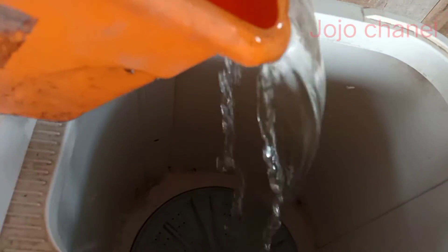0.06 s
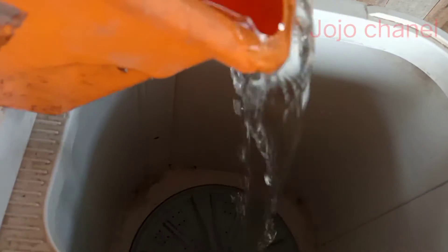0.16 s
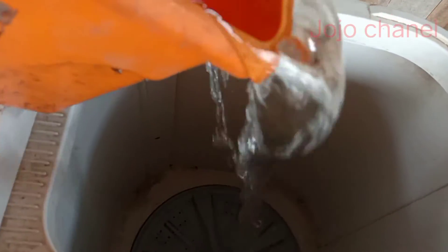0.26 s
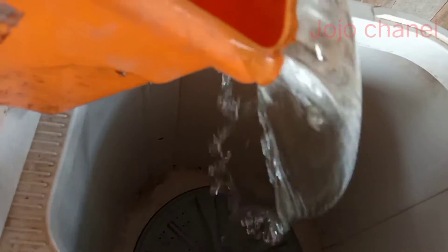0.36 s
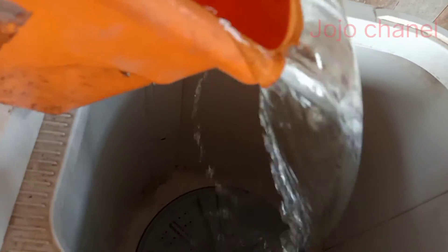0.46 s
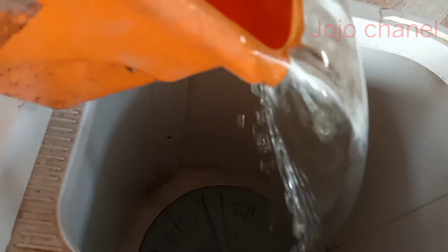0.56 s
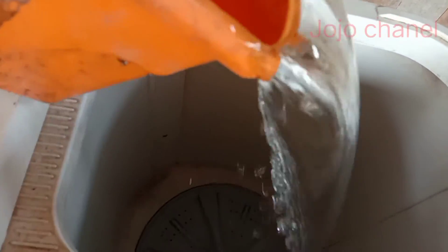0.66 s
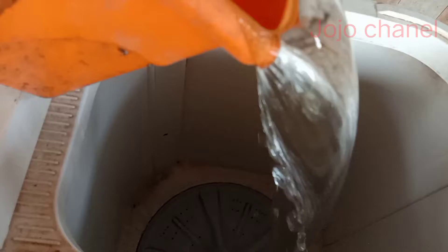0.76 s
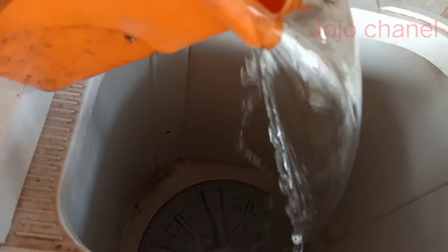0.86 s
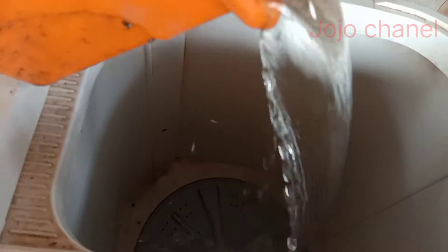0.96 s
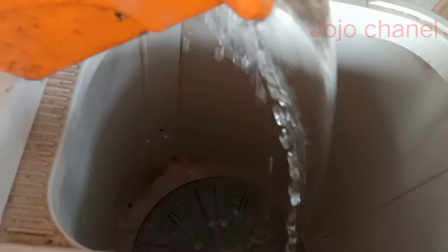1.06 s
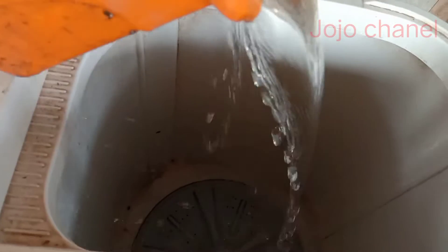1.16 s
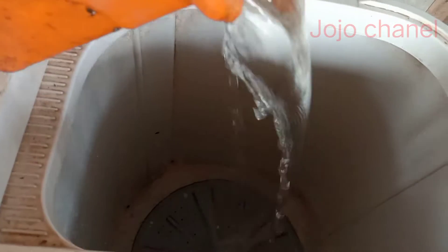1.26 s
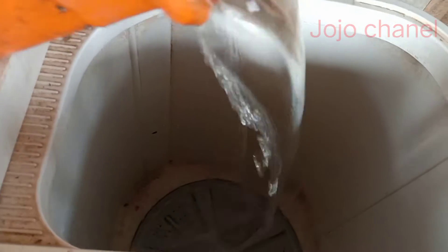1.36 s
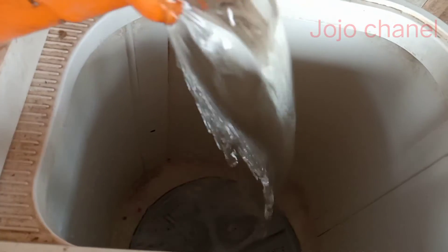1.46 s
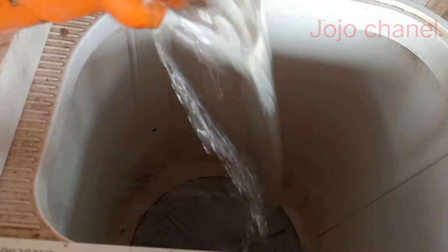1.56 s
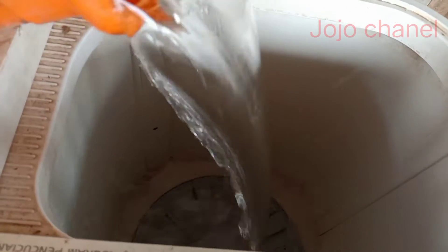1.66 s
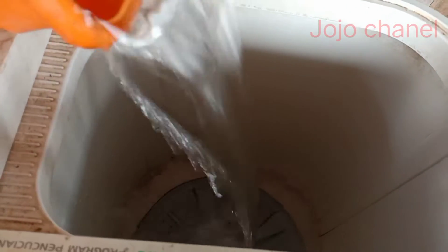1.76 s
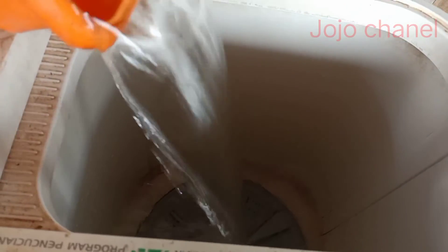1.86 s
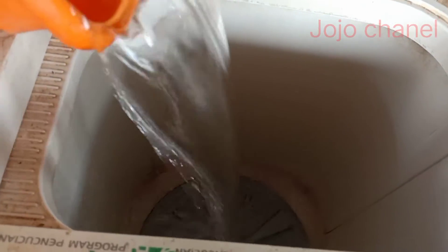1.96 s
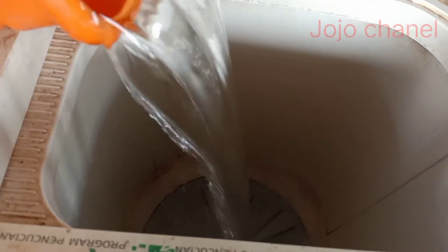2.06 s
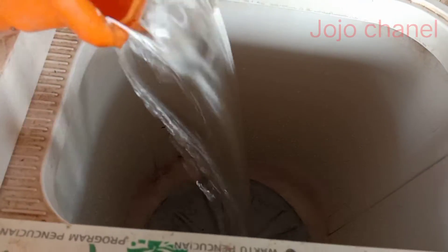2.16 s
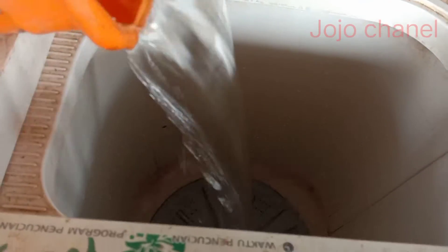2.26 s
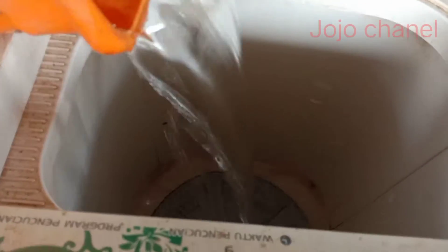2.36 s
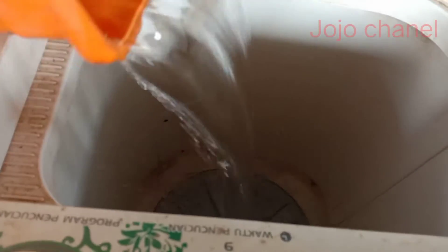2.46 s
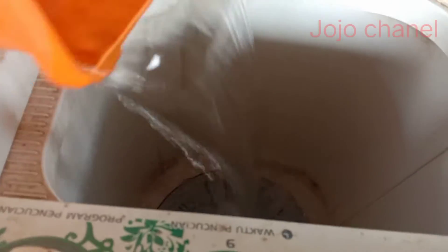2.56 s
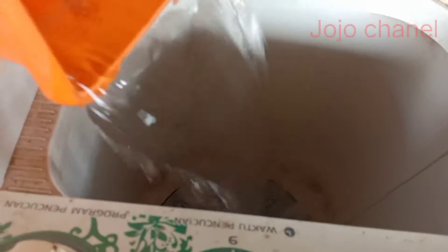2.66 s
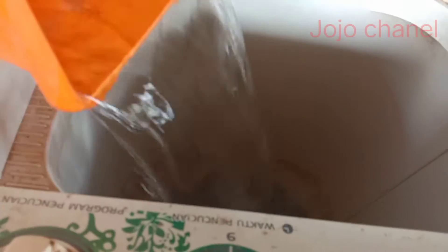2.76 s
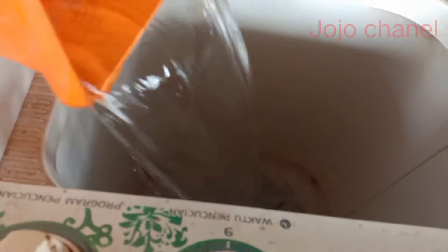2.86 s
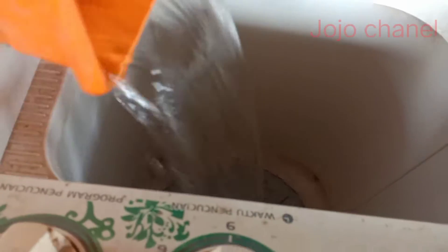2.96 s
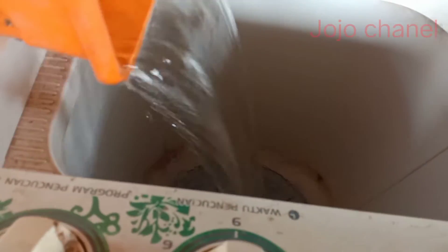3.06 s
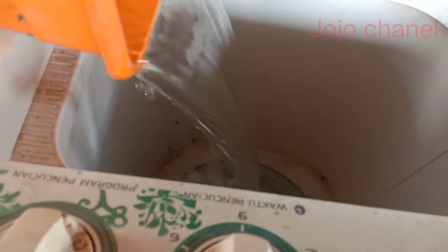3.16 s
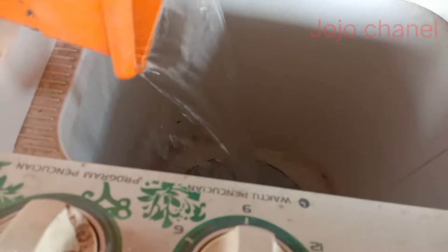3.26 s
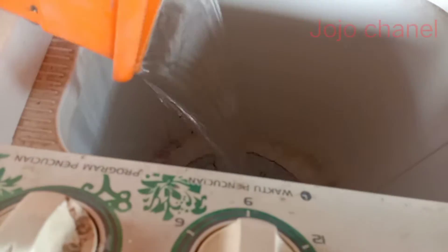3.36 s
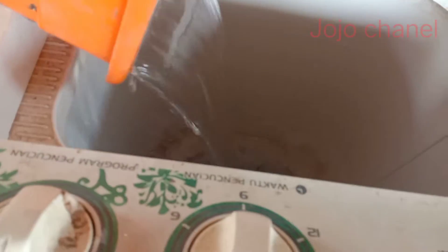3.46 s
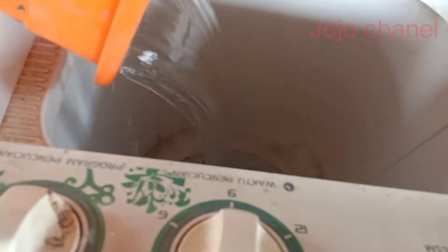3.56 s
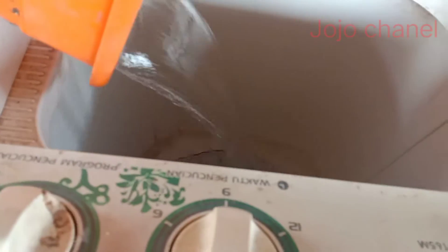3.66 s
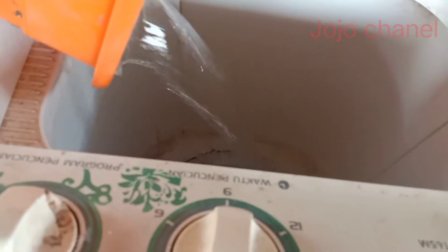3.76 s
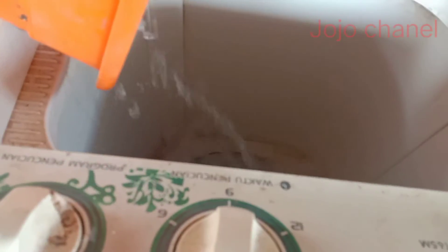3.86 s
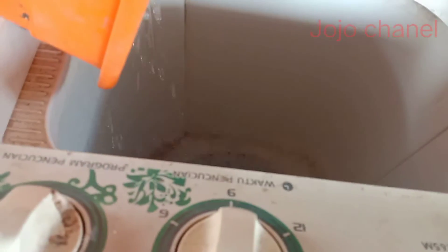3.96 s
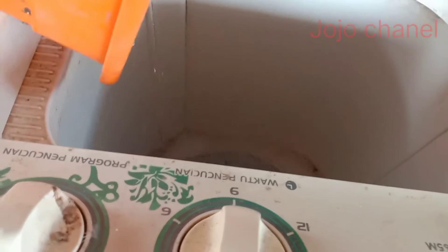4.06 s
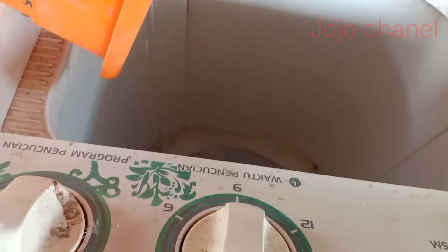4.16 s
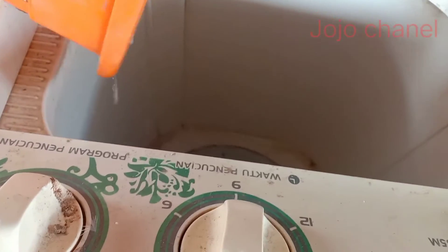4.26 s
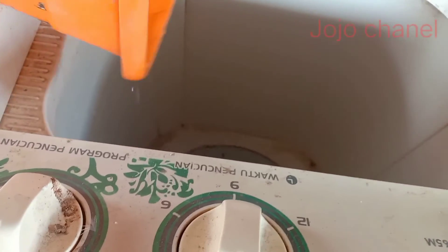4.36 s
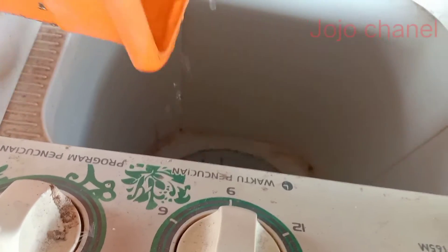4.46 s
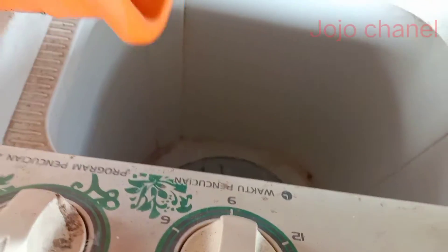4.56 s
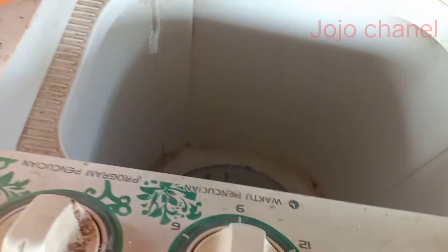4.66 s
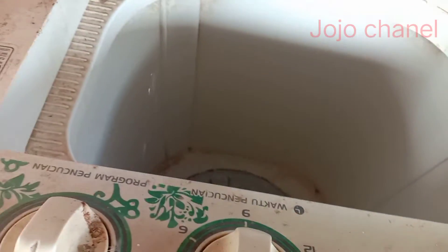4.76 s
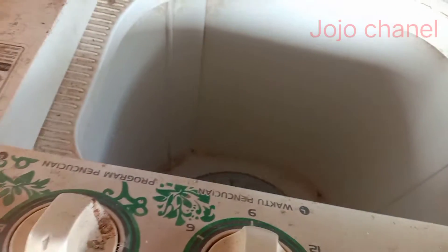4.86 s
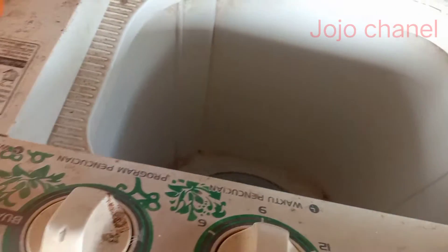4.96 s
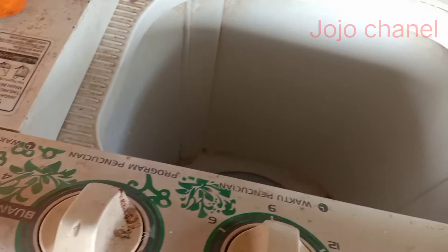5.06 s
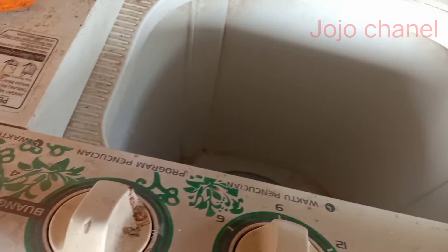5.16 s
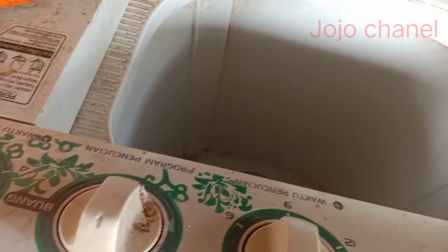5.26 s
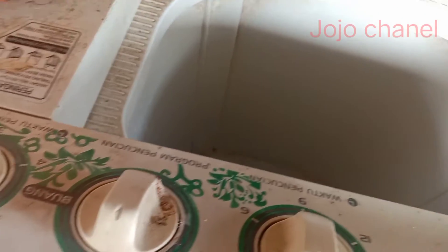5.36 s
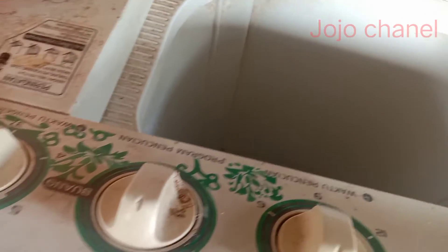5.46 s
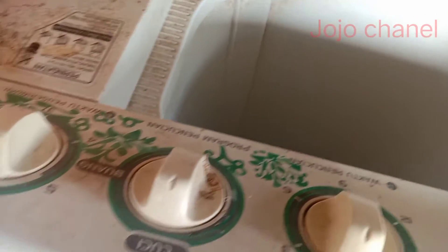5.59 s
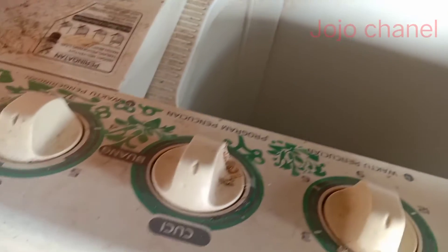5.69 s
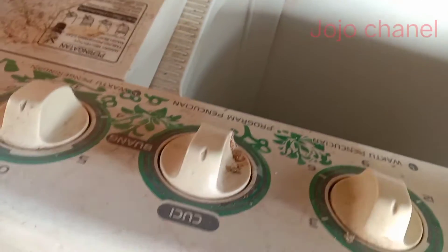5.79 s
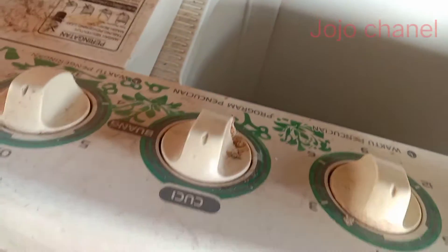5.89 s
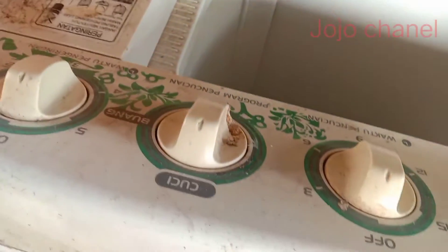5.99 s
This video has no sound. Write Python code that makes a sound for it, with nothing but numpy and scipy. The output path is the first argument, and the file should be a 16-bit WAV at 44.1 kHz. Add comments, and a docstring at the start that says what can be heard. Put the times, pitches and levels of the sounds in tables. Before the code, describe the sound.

A steady, lumpy stream splatters on the floor of a deep plastic tub, breaks off, and leaves small drips, bubbles and light bucket bumps.

```python
"""In a quiet room, water poured from a bucket splashes on the floor of a deep plastic tub that booms and rings.
The stream is droplet grains and noise over gurgling bubbles; the pushing water drives resonances of the tub.
Slaps are ticks with bursts of fizz, bubbles are short rising tones. Then the stream breaks off and the pool
settles with a few drips, while the bucket knocks (struck modes) and rubs (stick-slip clicks) on the plastic."""
import sys
import numpy as np
from scipy import signal
from scipy.fft import rfft, irfft
from scipy.io import wavfile
from scipy.ndimage import uniform_filter1d

SR = 44100
rng = np.random.default_rng(int(sys.argv[2]) if len(sys.argv) > 2 else 0)


def level_to_linear(level):
    """Convert decibel levels to linear amplitude factors, elementwise."""
    exponent = np.asarray(level, float) / 20
    return 10 ** exponent


def transcribe(u):
    """Save the signal u as a 16-bit wav file named by the first command-line argument.

    u: samples, shape (n,) or (channels, n), limited to [-1, 1]; the rate is SR.
    q: integer samples, one column per channel.
    """
    v = np.clip(np.atleast_2d(u).T, -1, 1)
    q = np.round(v * 32767).astype(np.int16)
    wavfile.write(sys.argv[1], SR, q)


N = 265923  # length in samples


def evened(x):
    """Scales to rms 1."""
    return x / np.sqrt(np.mean(x ** 2) + 1e-20)


def add(mix, start_s, sound):
    """Mixes a sound in at its start time."""
    part = mix[round(start_s * SR):][:len(sound)]
    part += sound[:len(part)]


def coloured(x, points):
    """Flattens the spectrum of x, gives it the colour drawn by the points, and evens it to rms 1."""
    spectrum, hz = rfft(x), np.fft.rfftfreq(len(x), 1 / SR)
    own = np.sqrt(uniform_filter1d(abs(spectrum) ** 2, size=2001) + 1e-9)
    point_hz, point_db = np.transpose(points)
    colour_db = np.interp(np.log(hz + 1), np.log(point_hz), point_db, -90, -90)
    return evened(irfft(spectrum / own * level_to_linear(colour_db), len(x)))


def resonate(x, hz, width_hz):
    """Resonance of gain 1: shifts the pitch hz, fixed or gliding, to zero, smooths, and shifts back."""
    turn = np.exp(2j * np.pi * np.cumsum(hz * np.ones(len(x))) / SR)
    r = np.exp(-np.pi * width_hz / SR)
    return 2 * (turn * signal.lfilter([1 - r], [1, -r], x / turn)).real


def blip(hz, cycles, glide):
    """A pocket of air: quick start, dying over some cycles, in which the pitch rises by twice the glide."""
    u = np.arange(int(3 * SR * cycles / hz) + 8) * hz / SR  # time in cycles
    tone = np.sin(2 * np.pi * u * (1 + glide * u / cycles))
    return tone * (1 - np.exp(-3 * u)) * np.exp(-2.5 * u / cycles)


def ringing(x, peaks):
    """Steep resonances (pitch_hz, width_hz, level_db), each applied twice, the second twice as wide."""
    total = np.zeros(len(x))
    for hz, width_hz, level_db in peaks:
        total += level_to_linear(level_db) * evened(resonate(resonate(x, hz, width_hz), hz, 2 * width_hz))
    return evened(total)


def fluttering(tone, rough, width_hz):
    """Random swings of strength widen a tone into a band of the same power."""
    r = np.exp(-2 * np.pi * width_hz / SR)
    swing = evened(signal.lfilter([1], [1, -2 * r, r * r], rng.standard_normal(4000)))
    sound = tone * (1 - rough + rough * np.resize(swing, len(tone)))
    return sound / np.sqrt(1 - 2 * rough * (1 - rough))


def clumps(per_s, depth_db):
    """The stream breaks into lumps: gain that jumps up and sinks back."""
    lumps = (rng.random(N) < per_s / SR) * rng.exponential(1, N)
    fall = signal.lfilter([1], [1, -np.exp(-1 / (0.015 * SR))], lumps)
    return level_to_linear(depth_db * np.tanh(fall / 2))


def grains(lo_hz, hi_hz, per_s, cycles, spread_db, count):
    """Many small bursts on a ladder of pitches, each pitch with its own random train."""
    out = np.zeros(N)
    for hz in np.geomspace(lo_hz, hi_hz, count):
        strength = level_to_linear(spread_db * np.minimum(rng.exponential(1, N), 4))
        train = strength * (rng.random(N) < per_s / count / SR)
        out += signal.oaconvolve(train, blip(hz, cycles, 0.05))[:N]
    return out


def patchy(x, depth_db):
    """Separate splashes light up separate patches of pitch for a few hundredths of a second."""
    z = signal.stft(x, nperseg=256, noverlap=192)[2]
    field = uniform_filter1d(rng.standard_normal(z.shape[::-1]).T, size=4, axis=0)
    field = uniform_filter1d(field, size=12, axis=1)
    return evened(signal.istft(z * level_to_linear(depth_db * evened(field)), nperseg=256, noverlap=192)[1][:N])


def swelling(level_db, swells):
    """Adds the power of each swell (start_s, length_s, level_db), a rounded hump, to a level curve."""
    power = level_to_linear(2 * level_db)
    spill_s = 0.016  # each hump reaches this far past both ends
    for start_s, length_s, swell_db in swells:
        hump = 2 * np.hanning(int((length_s + 2 * spill_s) * SR))  # mean 1
        add(power, max(start_s - spill_s, 0), level_to_linear(2 * swell_db) * hump)
    return np.sqrt(power)


# colour of the room noise: pitch_hz [Hz], level_db [relative dB per Hz]
ROOM_COLOUR = [(18, -47), (30, -7), (173, 2), (284, -8.5), (728, -12), (1020, -23.5), (1290, -13),
               (1640, -16.5), (3230, -20), (4420, -32.5), (7080, -38.5), (8060, -40.5), (15500, -43.5)]


def room_noise():
    """The quiet room: steady noise in a fixed colour, at -67.5 dB rms."""
    return level_to_linear(-67.5) * coloured(rng.standard_normal(N), ROOM_COLOUR)


# faint strokes of plastic on plastic: start_s [s], length_s [s], level_db [dB], first_hz [Hz], last_hz [Hz]
RUB_STROKES = [(4.918, 0.11, -63, 7140, 7200), (4.99, .07, -61, 3180, 3530), (5.0, .14, -51.5, 3140, 3040),
               (5.042, 0.19, -57, 1400, 1300), (5.135, 0.2, -57, 3180, 3050),
               (5.314, 0.19, -63, 3160, 3050), (5.372, 0.14, -61.5, 1340, 1350),
               (5.46, .15, -71, 4020, 3880), (5.46, .09, -55, 3090, 2950), (5.474, 0.15, -50.5, 1305, 1255),
               (5.53, 0.073, -60, 2750, 2500), (5.77, .13, -75, 3990, 3870)]


def rubs():
    """Uneven stick-slip clicks excite one gliding resonance with a breathy skirt."""
    out = np.zeros(N)
    for start_s, length_s, level_db, first_hz, last_hz in RUB_STROKES:
        hz = np.linspace(first_hz, last_hz, int(length_s * SR))
        wander = evened(uniform_filter1d(rng.standard_normal(len(hz)), size=1200))
        hz = hz * (1 + 0.005 * wander)
        width_hz = 32 + 0.0095 * first_hz  # higher strokes are wider and breathier
        breath = min(first_hz / 5000, 1)
        slips = (rng.random(len(hz)) < 0.3 * hz / SR) * rng.standard_normal(len(hz))
        core = evened(resonate(resonate(slips, hz, width_hz), hz, 3 * width_hz))
        skirt = evened(resonate(resonate(slips[::-1], hz, 5 * width_hz), hz, 8 * width_hz))
        stroke = evened(core + breath * skirt) * signal.windows.tukey(len(hz), 0.38)
        add(out, start_s, level_to_linear(level_db) * stroke)
    return out


# modes the plastic rings with when knocked: pitch_hz [Hz], level_db [relative dB], t60_s [s]
PLASTIC_MODES = [(97.7, 7, 0.21), (135.4, -2, 0.27), (160.3, 7.5, 0.14), (239, 2, 0.13), (299, 0.5, 0.068),
                 (366, 0, 0.084), (428, 0, 0.076), (528, -10.5, 0.12), (586, -9, 0.066), (708, -11, 0.033),
                 (960, -8, 0.03), (1060, -5, 0.11), (1370, 5, 0.083), (1465, 6, 0.056), (1760, -8, 0.067),
                 (2000, -1.5, .05), (2330, 1, 0.049)]
# blows of the bucket: start_s [s], peak_db [dB, before microphone and room], centre_hz [Hz], spread [octaves]
KNOCK_BLOWS = [(4.437, -32, 1090, 0.29), (4.466, -27, 600, 0.47), (4.484, -32, 684, 0.43),
               (4.497, -28, 511, 0.85), (4.577, -41, 134, 0.85), (4.634, -37.5, 1760, 0.58),
               (4.833, -45.5, 146, 0.97), (4.878, -44, 145, 0.57), (4.958, -20.5, 418, 0.63),
               (4.994, -34.5, 533, 0.72), (5.011, -40, 436, 0.97), (5.173, -39, 426, 0.97),
               (5.194, -41.5, 428, .7), (5.732, -31.5, 450, 0.96), (5.744, -29, 372, 1.07),
               (5.755, -30, 151, 0.91), (5.767, -39, 458, 0.85), (5.785, -40, 115.6, 0.6),
               (5.811, -40.5, 121, .72), (5.84, -48, 129, .72)]


def knocks():
    """Each blow wakes the modes near its own centre; a soft contact rounds the start."""
    hz, mode_db, t60_s = np.array(PLASTIC_MODES).T[:, :, None]
    t, out = np.arange(SR // 3) / SR, np.zeros(N)
    for start_s, peak_db, centre_hz, spread in KNOCK_BLOWS:
        near_db = -9 * (np.log2(hz / centre_hz) / spread) ** 2
        # each grip differs; a bent panel starts sharp
        detune = 1 + 0.0375 * rng.standard_normal(hz.shape) + 0.097 * np.exp(-t / 0.015)
        turns = np.cumsum(detune * hz, axis=1) / SR + 0.84 * rng.random(hz.shape)
        modes = level_to_linear(mode_db + near_db - 60 * t / t60_s) * np.sin(2 * np.pi * turns)
        modes *= 1 - np.exp(-hz * t / 0.43)  # deep modes take longer to bloom
        crack = 0.44 * uniform_filter1d(rng.standard_normal(len(t)), size=7) * np.exp(-t / 0.0023)
        sound = (modes.sum(0) + crack) * (1 - np.exp(-t / 0.00058))
        add(out, start_s, level_to_linear(peak_db) * sound / abs(sound).max())
    return out


# last drips on the pool: start_s [s], level_db [dB], pitch_hz [Hz], mist [share of fine mist at the very top]
POOL_DRIPS = [(4.2694, -44, 4640, 0.1), (4.2847, -46, 9450, 0.1), (4.338, -39, 5500, 0.4),
              (4.3594, -41, 5800, 0.1), (4.3955, -49, 5500, .9), (4.4894, -52, 4600, 0.1),
              (4.5775, -56, 7000, 0.1), (4.6445, -52, 9500, 0.98), (4.7391, -73, 9500, .9),
              (4.803, -65, 9960, 0.1), (4.8653, -68, 9100, 0.1), (4.9994, -66, 7200, 0.1),
              (5.1098, -65, 5800, 0.1), (5.2854, -70, 8960, 0.1), (5.9369, -61, 7340, 0.1)]


def drips():
    """Each drip leaves a short band of fizz and a puff of mist."""
    out = np.zeros(N)
    life_s, mist_hz = 0.017, 14900
    for start_s, level_db, pitch_hz, mist in POOL_DRIPS:
        for hz, share in ((pitch_hz, 1), (mist_hz, mist)):
            burst = fluttering(blip(hz, life_s * hz, 0.0059), 0.52, 0.097 * hz)
            add(out, start_s, share * level_to_linear(level_db) * burst)
    return out


# bubbles caught under the stream and popping in the pool:
# start_s [s], level_db [dB, before microphone and room], pitch_hz [Hz], life [cycles]
POOL_BUBBLES = [(0.152, -29, 836, 61), (0.236, -26.5, 840, 59), (0.603, -13.5, 1180, 8.4),
                (0.703, -17.5, 751, 9.6), (0.759, -19, 687, 13), (1.0735, -10, 2194, 26),
                (1.1293, -7.5, 1440, 13), (1.1972, -14, 2100, 19), (1.2457, -17.5, 1260, 23),
                (1.379, -12.5, 597, 6.5), (1.5454, -13, 1880, 30), (1.7659, -11, 1245, 26),
                (1.8573, -11.5, 1220, 58), (2.82, -11.5, 2000, 40), (2.8854, -18.5, 1500, 45),
                (2.899, -17, 1200, 27), (2.983, -17.5, 1450, 17), (3.672, -26, 906, 28),
                (4.0915, -20, 1250, 24), (4.1789, -26, 1220, 20), (4.2244, -33.5, 1430, 70),
                (4.2294, -33, 3640, 87), (4.2646, -27, 1330, 12), (4.322, -34.5, 850, 62),
                (4.331, -38, 2500, 120), (4.356, -36, 3300, 70), (4.438, -26.5, 704, 29),
                (4.44, -32, 1090, 60), (4.458, -35, 1520, 40), (4.472, -31, 700, 16),
                (4.4794, -29, 1100, 25), (4.634, -38, 1760, 35), (4.6359, -48, 2400, 40),
                (4.7451, -44, 1600, 25), (4.8357, -40.5, 1270, 18), (4.8374, -48, 760, 20),
                (4.892, -45.5, 1970, 32), (4.899, -46, 760, 24), (4.9472, -46, 2330, 39),
                (4.9591, -40, 1260, 70), (4.998, -37, 1280, 25), (4.998, -32.5, 1810, 44),
                (5.0549, -47, 1410, 35), (5.087, -39, 990, 19), (5.0986, -27, 1200, 7.1),
                (5.1552, -46, 1350, 44), (5.4806, -49, 3040, 60), (5.733, -42, 1287, 34),
                (5.7676, -50, 1260, 28), (5.8394, -50, 1070, 32)]


def bubbles():
    """A trapped bubble sounds as a nearly pure tone, rising a little as it dies."""
    out = np.zeros(N)
    for start_s, level_db, hz, cycles in POOL_BUBBLES:
        add(out, start_s, level_to_linear(level_db) * fluttering(blip(hz, cycles, 0.036), 0.35, 0.13 * hz))
    return out


# lumps of water that slap down: start_s [s], fizz_db [dB, before microphone and room],
# pitch_hz [Hz], tick_db [dB over the fizz]
WATER_SLAPS = [(0.0167, -5.5, 6470, -22), (0.0538, -11.5, 4300, -7), (0.191, -8, 5620, 1.5),
               (0.2232, -11, 3200, -4.5), (0.268, -13, 5430, -2), (0.4968, -6.5, 4980, 0),
               (0.535, -7.5, 5630, -5), (0.583, -9, 5430, -5), (0.631, -17.5, 2800, 8),
               (0.6504, -6, 3950, -4.5), (0.6687, -9, 2850, -2.5), (0.6871, -3.5, 5750, -1.5),
               (0.7195, -3, 6660, -2.5), (0.7722, -11, 2800, 18), (1.072, -12, 2265, -3),
               (1.127, -8, 2300, -12), (1.1972, -12, 2095, -6), (1.3394, -26, 4100, -5),
               (1.388, -3, 6500, -5), (1.397, -6.5, 6500, -6), (1.425, -9.5, 2800, -10),
               (1.493, -9, 2600, 11), (1.7659, -7, 4500, 1), (1.7746, -10, 2300, 0.5),
               (1.7755, -10, 5500, -3), (1.802, -14, 5200, 0), (1.832, -3.5, 5740, -9.5),
               (1.8558, -0.5, 5400, -1), (1.962, -11, 3000, -2), (2.067, -11.5, 3810, -1),
               (2.3914, -8.5, 5300, -4), (2.5391, -6.5, 3520, -6), (2.573, -10, 5000, 3),
               (2.644, -8, 4500, -4), (2.82, -24, 2000, -6), (2.8809, -18, 1543, -6),
               (2.9824, -7.5, 5750, -5), (3.16, -11.5, 3300, -2), (3.455, -14, 2530, -2),
               (3.575, -11.5, 2510, -4), (3.973, -8, 3600, -3), (4.0397, -26, 6900, -4),
               (4.0567, -8, 6800, 10), (4.09, -13.5, 2330, -4.5), (4.147, -9, 4900, 4)]


def slaps():
    """A slap is a tick with a burst of fizz around the same pitch."""
    out = np.zeros(N)
    for start_s, fizz_db, hz, tick_db in WATER_SLAPS:
        add(out, start_s, level_to_linear(fizz_db + tick_db) * fluttering(blip(hz, 1.4, 0.057), 0.15, 0.36 * hz))
        add(out, start_s, level_to_linear(fizz_db) * fluttering(blip(hz, 38, 0.0061), 0.7, 0.25 * hz))
    return out


# how hard the water works, from falling stream to settling pool: time_s [s], splash_db [dB]
WATER_FLOW = [(0.0, -26.5), (0.03, -34), (0.11, -37.5), (0.16, -33.5), (0.2, -28), (0.47, -28.5),
              (0.72, -27.5), (1.0, -26.5), (1.25, -25.5), (1.32, -25.5), (1.41, -25), (1.7, -26.5),
              (1.78, -25.5), (1.87, -27), (2.05, -25.5), (2.32, -29), (2.48, -32), (2.54, -28.5),
              (2.6, -27.5), (2.65, -27), (2.77, -28), (2.97, -27), (3.08, -26.5), (3.16, -27.5),
              (3.41, -28.5), (3.47, -27.5), (3.68, -27.5), (3.81, -32), (3.85, -27.5), (3.91, -31),
              (4.06, -29.5), (4.135, -33.5), (4.15, -32.5), (4.2, -31.5), (4.22, -44.5), (4.25, -50.5),
              (4.5, -60.5), (4.76, -65), (5.04, -65.5), (5.45, -85.5), (5.56, -75), (5.68, -91),
              (5.83, -77), (6.03, -103)]


def water_flow():
    """Level of the splash in dB, and the pool deepening from 0 to 1 to cushion the bare plastic floor."""
    t = np.arange(N) / SR
    return np.interp(t, *np.transpose(WATER_FLOW)), np.interp(t, [0.98, 4], [0, 1])


# how each layer follows the water: level_db [dB at -28 dB of flow, bare floor],
# follow [dB per dB of flow], deep_db [dB of change once the pool is deep]
LAYER_LEVELS = {"air": (-36, 0.44, -9.5), "panels": (-38.5, 0.58, -9.5), "ring": (-45.5, 0.77, 5.5),
                "gurgle": (-39.5, 0.73, 0), "spray": (-36, 0.99, -2.5)}


def layer_db(name, flow_db, pool):
    """Level curve of one layer, driven by the flow and the depth of the pool."""
    level_db, follow, deep_db = LAYER_LEVELS[name]
    return level_db + follow * (flow_db + 28) + deep_db * pool


# air column of the tub over the bare floor: pitch_hz [Hz], width_hz [Hz], level_db [relative dB]
AIR_MODES = [(121, 22, -5), (135.4, 28, 6.5)]
# panels of the tub: pitch_hz [Hz], width_hz [Hz], level_db [relative dB]
PANEL_MODES = [(196.1, 14, -0.5), (216, 30, -1.5), (247.7, 26, -8.5)]
# swells in the boom of the air, the hum of the panels and the ring of the wall:
# start_s [s], length_s [s], level_db [dB]
AIR_SWELLS = [(0.199, 0.071, -28), (0.284, .19, -32), (0.535, 0.088, -35), (0.723, 0.08, -33.5),
              (0.88, .037, -32), (1.062, 0.27, -34), (1.28, 0.18, -33), (1.772, 0.056, -34.5),
              (1.922, .05, -36), (2.496, 0.088, -38.5), (2.7, 0.041, -41), (2.89, 0.044, -47),
              (2.984, .05, -43), (3.3, 0.086, -40), (3.45, 0.044, -39), (3.585, 0.096, -41),
              (3.985, 0.23, -43.5), (4.3, 0.05, -50.5)]
PANEL_SWELLS = [(0.0, 0.073, -41.5), (0.19, 0.057, -37), (1.085, 0.02, -31.5), (1.294, 0.034, -33),
                (1.366, .07, -34.5), (1.466, 0.032, -33), (1.514, .22, -31), (1.861, 0.051, -34),
                (2.0, 0.059, -38.5), (2.52, 0.028, -39.5), (2.63, .05, -40), (2.96, 0.034, -41.5),
                (3.13, 0.043, -42), (3.62, .06, -45.5), (4.08, 0.031, -48.5)]
WALL_SWELLS = [(0.505, 0.078, -37), (1.5, 0.11, -36.5), (1.63, 0.068, -41), (1.765, 0.087, -38),
               (1.849, 0.065, -32.5), (1.93, 0.03, -39), (2.03, 0.12, -36), (2.41, .06, -37),
               (2.68, 0.095, -33), (2.78, .05, -36.5), (3.04, 0.079, -37), (3.2, .06, -40),
               (3.5, 0.069, -43), (3.66, 0.03, -39), (3.82, 0.041, -41.5), (3.99, .04, -39)]


def tub(flow_db, pool, lumps):
    """The pushing water drives the air column, the panels and a ringing wall."""
    push = rng.standard_normal(N) * clumps(37, 2.7)
    # the pool shortens the air column, so its pitch rises by a tenth
    air_modes = [(hz * (1 + 0.1 * pool), width_hz, level_db) for hz, width_hz, level_db in AIR_MODES]
    wall = evened(resonate(resonate(push * lumps, 1260, 71), 1260, 300))
    air_gain = swelling(layer_db("air", flow_db, pool), AIR_SWELLS)
    panel_gain = swelling(layer_db("panels", flow_db, pool), PANEL_SWELLS)
    wall_gain = swelling(layer_db("ring", flow_db, pool), WALL_SWELLS)
    return air_gain * ringing(push, air_modes) + panel_gain * ringing(push, PANEL_MODES) + wall_gain * wall


# colour of the gurgle: pitch_hz [Hz], level_db [relative dB per Hz]
GURGLE_COLOUR = [(25, -34.5), (60, -18), (100, -11.5), (300, -11), (460, -5), (560, -9), (646, -4),
                 (800, -4), (1050, -5), (1300, -1), (1600, -30.5)]
# swells in the loudness of the gurgle: start_s [s], length_s [s], level_db [dB]
GURGLE_SWELLS = [(0.55, .05, -42), (0.7, 0.22, -42), (1.25, 0.036, -36.5), (1.38, 0.071, -34.5),
                 (1.52, 0.087, -38.5), (1.77, 0.17, -37.5), (2.52, 0.037, -47), (2.79, .04, -42),
                 (3.13, 0.069, -38.5), (3.5, 0.058, -41), (3.57, 0.035, -39.5), (3.66, 0.038, -38.5),
                 (4.08, .06, -45)]


def gurgle(flow_db, pool):
    """Low bubble grains over noise of the same colour."""
    low = coloured(grains(300.3, 1200, 450, 18, 1.8, count=24), GURGLE_COLOUR)
    low += 0.45 * coloured(rng.standard_normal(N), GURGLE_COLOUR)
    return swelling(layer_db("gurgle", flow_db, pool), GURGLE_SWELLS) * evened(low)


# colour of the spray: pitch_hz [Hz], level_db [relative dB per Hz]
SPRAY_COLOUR = [(4590, -22.5), (7800, -9.5), (8130, -8.5), (9370, -3), (13500, -10.5), (14400, -3),
                (14900, -7.5), (15300, 4), (15800, -7.5)]


def spray(flow_db, pool, lumps):
    """Very short, high droplet grains over hiss, rising and sinking with the lumps."""
    mist = coloured(grains(7500, 21000, 3100, 1.8, 5.7, count=12), SPRAY_COLOUR)
    mist += 1.2 * coloured(rng.standard_normal(N), SPRAY_COLOUR)
    return level_to_linear(layer_db("spray", flow_db, pool)) * evened(mist * lumps)


# colour of the splash: pitch_hz [Hz], level_db [relative dB per Hz]
SPLASH_COLOUR = [(790, -26.5), (1350, 1), (1670, 0.5), (2290, 2), (3470, 1.5), (4350, -1), (5580, 2),
                 (6200, -2.5), (6840, 1.5), (7320, -0.5), (8200, -17.5), (10700, -42), (18000, -120)]


def splash(flow_db, pool, lumps):
    """Droplet bursts over hiss, in patches, with longer-lived bubbles among them."""
    drops = coloured(grains(1300, 8940, 2500, 10, 1.5, count=40), SPLASH_COLOUR)
    drops += 1.7 * coloured(rng.standard_normal(N), SPLASH_COLOUR)
    pops = coloured(grains(1400, 6500, 160, 16, 1.0, count=40), SPLASH_COLOUR)
    drops = patchy(drops, 1.94) + 0.36 * pops
    drops -= 0.53 * (1 - pool) ** 2 * resonate(drops, 1900, 1700)  # a bare floor lacks this band
    drops -= 0.17 * pool * resonate(drops, 6500, 3000)  # a deep pool swallows this one
    return level_to_linear(flow_db) * evened(drops * lumps)


def stream():
    """One flow and one pool shape all layers; splash, spray and the wall ring share a train of lumps."""
    flow_db, pool = water_flow()
    lumps = clumps(45, 4.0)
    deep = tub(flow_db, pool, lumps) + gurgle(flow_db, pool)
    return deep + spray(flow_db, pool, lumps) + splash(flow_db, pool, lumps)


def reverberation(x):
    """Short diffuse tail from tub and room: dying noise after a gap of 3 ms."""
    t, t60_s = np.arange(SR // 2) / SR, 0.075
    tail = rng.standard_normal(len(t)) * level_to_linear(-60 * t / t60_s) * (t > 0.003)
    return level_to_linear(-6) * signal.oaconvolve(x, tail / np.linalg.norm(tail))[:N]


# treble response of the microphone: pitch_hz [Hz], level_db [dB]
MIC_RESPONSE = [(20, -2), (6900, -7.5), (8100, -10), (9400, -8.5), (13500, -10), (14900, -1.5),
                (22050, -11)]


def microphone(x):
    """Falling treble with a notch and a top bump, as a causal minimum-phase filter."""
    point_hz, point_db = np.transpose(MIC_RESPONSE)
    hz = abs(np.fft.fftfreq(1024, 1 / SR))
    log_gain = np.log(level_to_linear(np.interp(np.log(hz + 1), np.log(point_hz), point_db)))
    taps = np.fft.ifft(np.exp(np.conj(signal.hilbert(log_gain)))).real[:512]
    return signal.oaconvolve(x, taps)[:N]


def scene():
    """All sources; the hits and rubs also excite the short tail of tub and room."""
    hits = rubs() + knocks() + bubbles() + slaps()
    heard = microphone(hits + reverberation(hits))
    # noise and stream colours and drip levels already hold the microphone's treble response
    return (room_noise() + drips() + heard + stream())[None]


def band_limit(x):
    """A steep low-pass at the top of the band."""
    return signal.sosfilt(signal.butter(12, 16830, fs=SR, output="sos"), x)


def record(dry):
    """Finishes the mix with a steep low-pass at 15520 Hz."""
    edge = signal.firwin(511, 15520, window=("kaiser", 9), fs=SR)
    mix = signal.oaconvolve(dry, edge[None], "same")
    return band_limit(mix)


dry = scene()
out = record(dry)
transcribe(out)
```